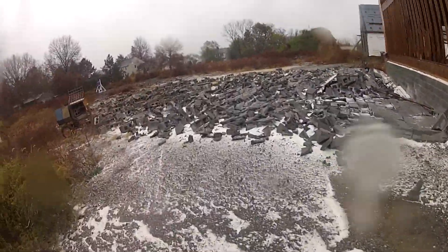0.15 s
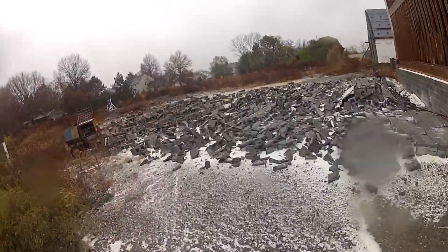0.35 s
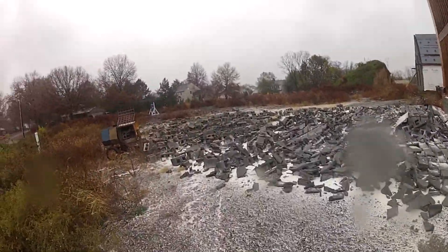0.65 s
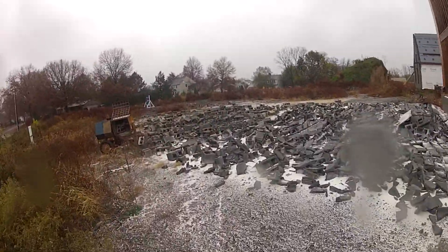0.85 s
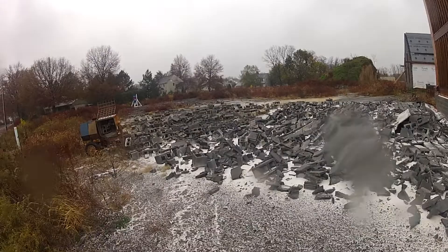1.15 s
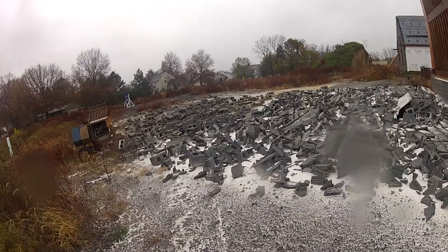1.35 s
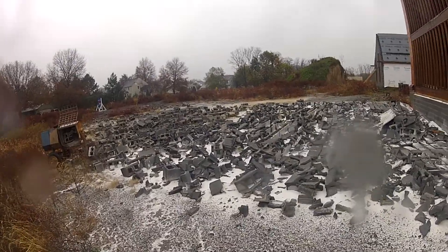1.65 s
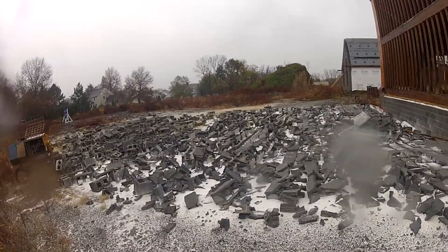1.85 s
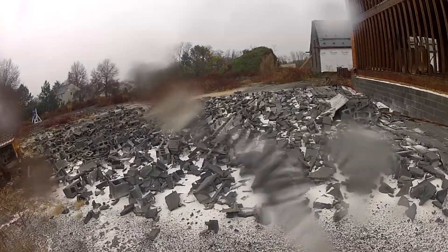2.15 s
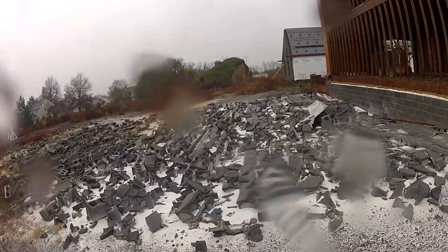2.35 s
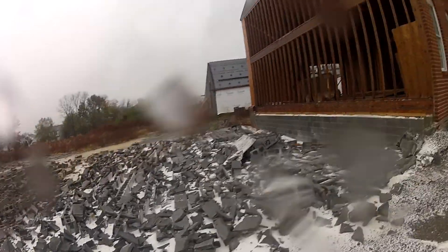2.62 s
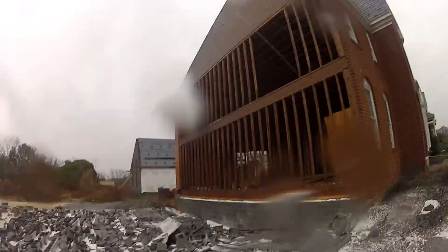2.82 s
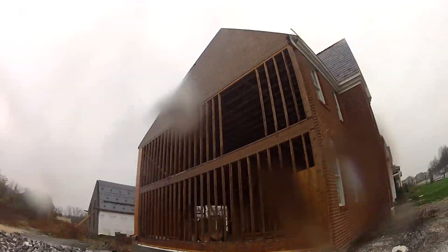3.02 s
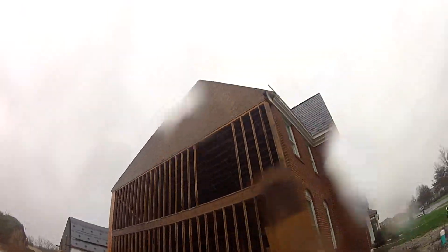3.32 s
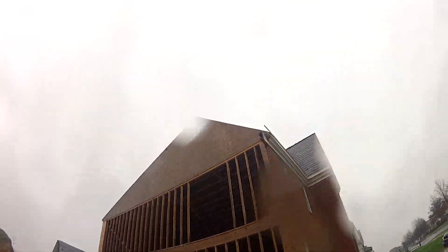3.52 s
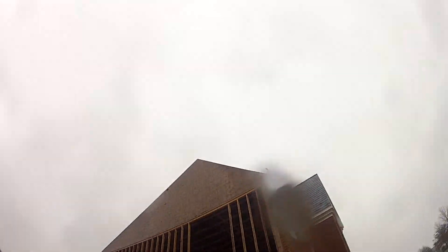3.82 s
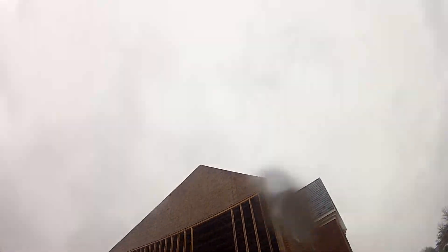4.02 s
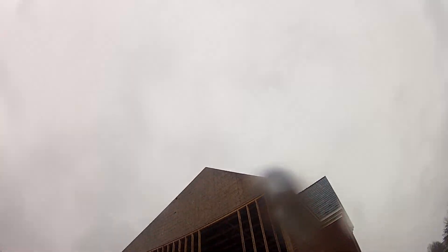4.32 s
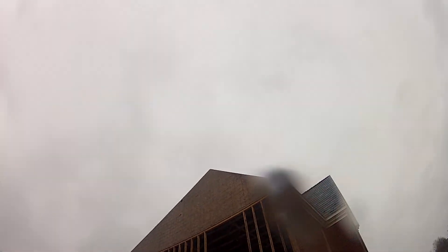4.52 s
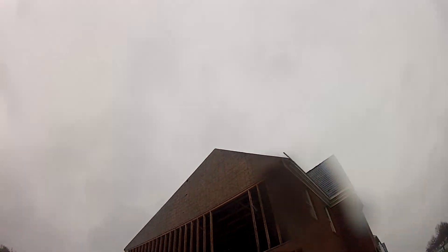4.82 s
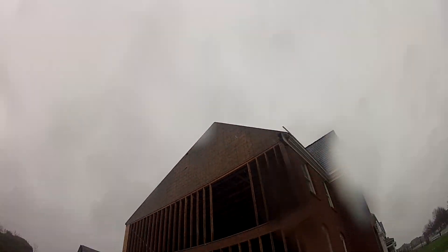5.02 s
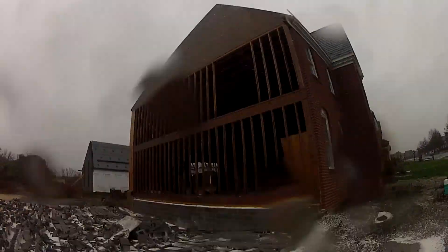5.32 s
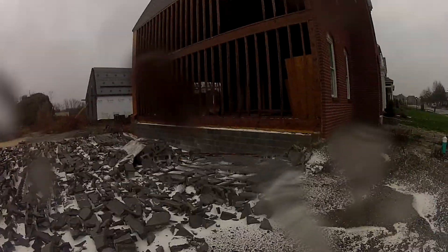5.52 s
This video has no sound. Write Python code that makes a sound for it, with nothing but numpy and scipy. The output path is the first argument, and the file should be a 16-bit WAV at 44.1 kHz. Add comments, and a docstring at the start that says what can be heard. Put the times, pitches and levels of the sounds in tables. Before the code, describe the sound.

Wind-driven rain and ice pellets strike a plastic camera housing outdoors, heard from inside the case, very close and dry. Over a faint muffled storm wash and low lumpy wind, light ticks begin around 0.3 s and cluster to 0.9 s; a bright hard crack comes at 1.13 s. From 1.6 s hits grow stronger, crowding between 1.85 and 2.3 s with tiny fizzes of droplets and a soft thump. At 2.96 s a sharp hit coincides with a drop popping on the left only. Around 3.5 s something wet slides over the shell with a very brief rising squeak and a short rasp, followed by hard knocks at 3.75 and 3.8 s, the latter with a deep thump. Ticks thin out after 4.1 s; from 4.55 to 5.4 s it is nearly calm. Then a gust swells, with a short rasp and a loud flurry of cracks at 5.45 to 5.52 s, ending in a fizz.

```python
"""Wind-driven rain and ice pellets tick against a camera's plastic housing outdoors.
Each hit cracks and rings the shell for a few milliseconds; faint drizzle ticks on between the hits.
Some tiny droplets fizz in short showers, soft blows thump the case, and one drop pops on the left only.
Twice something wet slides over the shell with a rasp, squeaking the first time.
Behind lie the muffled wash of the storm and a low rush of wind, noises that swell together in the gusts."""
import sys
import numpy as np
from scipy import signal
from scipy.io import wavfile
from scipy.ndimage import uniform_filter1d

SR = 44100
rng = np.random.default_rng(int(sys.argv[2]) if len(sys.argv) > 2 else 0)


def persist_wave(psi):
    """Save psi, clipped to +-1, as 16-bit WAV."""
    counts = np.round(np.clip(psi, -1, 1) * 32767).astype(np.int16)
    wavfile.write(sys.argv[1], SR, np.atleast_2d(counts).T)


N = 249606  # length of the scene in samples


def gain_of(db):
    """Turns decibels into a factor."""
    return 10 ** (np.asarray(db) / 20)


def evened(x):
    """Scales a signal to an average strength (rms) of 1."""
    return x / np.sqrt(np.mean(x ** 2) + 1e-20)


def read(points, hz):
    """Reads a spectrum between its points, along a log-frequency axis."""
    point_hz, value = np.transpose(points)
    return np.interp(np.log(hz + 1), np.log(point_hz + 1), value)


def add(mix, start_s, sound):
    """Mixes a sound in at a given time, cutting off what does not fit."""
    part = mix[max(round(start_s * SR), 0):][:len(sound)]
    part += sound[:len(part)]


def filtered(x, order, hz, kind):
    """Keeps only part of the pitch range, with a Butterworth filter."""
    return signal.lfilter(*signal.butter(order, hz, kind, fs=SR), x)


def noise(spectrum, patchy_db, flicker_db):
    """Coloured noise with small drifting patches and a quick flicker shared by all bands."""
    hz = np.fft.rfftfreq(2048, 1 / SR)
    real, imaginary, patches = rng.standard_normal((3, N // 512 + 5, len(hz)))
    patches = uniform_filter1d(patches, size=4, axis=0)  # smooth over time
    patches = evened(uniform_filter1d(patches, size=12, axis=1, mode="wrap"))  # and over pitch
    frames = (real + 1j * imaginary) * gain_of(read(spectrum, hz) + patchy_db * patches)
    coloured = signal.istft(frames.T, nperseg=2048, noverlap=1536)[1][:N]
    flicker = uniform_filter1d(rng.standard_normal(N), size=600)
    flicker = evened(uniform_filter1d(flicker, size=350))
    return evened(coloured * gain_of(flicker_db * flicker))


# strength of the wind over time: (time_s, level_db before the wind's boost)
GUSTS = [(0.0, -55), (1.02, -56), (2.61, -55.5), (3.18, -52.5), (3.39, -53), (3.77, -54), (3.94, -56.5),
         (4.52, -58), (4.78, -59), (5.42, -52.5), (5.55, -47.5), (5.66, -60.5)]


def gust_strength():
    """The wind's changing push, as a gain for every sample."""
    time_s, level_db = np.transpose(GUSTS)
    return gain_of(np.interp(np.arange(N) / SR, time_s, level_db))


# colour of the storm's wash heard through the case: (pitch_hz, relative level_db per Hz)
WASH_COLOUR = [(100, 2), (550, -8), (820, -1), (1100, -4), (1800, -2.5), (2230, 2.5), (2520, -12),
               (3000, -7), (4000, -14), (5000, -15.5), (6000, -27.5), (7000, -19), (9000, -18),
               (9450, -18.5), (9850, -12), (11000, -22), (12300, -32), (14200, -12.5), (14500, -19),
               (15150, -24), (15500, -39.5)]


def storm_wash(gust, level_db=-60, follow=0.49):
    """Distant rain blurs into noise; it gains `follow` dB for each dB of gust."""
    swell = evened(gust ** follow)
    return gain_of(level_db) * swell * noise(WASH_COLOUR, patchy_db=1, flicker_db=-0.8)


# colour of the wind on the case: (pitch_hz, relative level_db per Hz)
WIND_COLOUR = [(8.8, -30), (15, 3), (27, -3.5), (70, -3.5), (157, -11), (210, -14), (269, -15),
               (408, -22.5), (600, -31.5), (780, -46), (1320, -120)]


def wind_rush(gust, boost_db=2.5):
    """Wind on the case makes a low, lumpy rush that follows the gusts fully."""
    return gain_of(boost_db) * gust * noise(WIND_COLOUR, patchy_db=1.5, flicker_db=2.7)


# colour of the eddies that differ between the two microphone ports: (pitch_hz, relative level_db per Hz)
EDDY_COLOUR = [(12, -33.5), (20, 13), (377, -3), (1780, -24), (2100, -27), (2690, -16.5), (4950, -12),
               (6010, -26), (7300, -17.5), (15000, -55)]


def wind_eddies(level_db=-76):
    """Faint eddies push the two ports in opposite directions, so left and right differ."""
    eddies = gain_of(level_db) * noise(EDDY_COLOUR, patchy_db=2, flicker_db=2)
    return eddies * np.array([[1], [-1]])


# soft blows and buffets that push the whole case: (start_s, level_db before softening, swing_hz)
THUMPS = [(0.176, -35, 39.7), (0.738, -37.5, 107), (1.557, -36.5, 170), (2.061, -22.5, 390),
          (2.221, -33, 380), (2.452, -38, 100), (2.957, -24.5, 283), (3.627, -31.5, 35), (3.814, -17, 78.6),
          (3.9205, -24, 81), (4.925, -36, 178), (5.385, -34.5, 110)]


def thumps(damping=2, rise_s=0.00041, soft_hz=520):
    """A soft blow squeezes the air in the case: a quick push and one slow swing back."""
    out, t = np.zeros(N), np.arange(5000) / SR
    for start_s, level_db, swing_hz in THUMPS:
        swing = np.cos(2 * np.pi * swing_hz * t) * np.exp(-damping * swing_hz * t)
        onset = 1 - np.exp(-t / rise_s)
        add(out, start_s, -gain_of(level_db) * swing * onset)
    return filtered(out, 2, soft_hz, "lowpass")


# a drop that lands right on the left microphone port: (start_s, level_db before the leak)
PORT_DROP = (2.958, -16)


def port_drop(fall_s=0.0015, splash=0.2, splash_s=0.0023, leak_hz=110):
    """A sharp push and a tiny splash, heard on the left only; the slow part leaks away."""
    out, t = np.zeros((2, N)), np.arange(1500) / SR
    wet = filtered(rng.standard_normal(len(t)), 1, 3000, "lowpass") * np.exp(-t / splash_s)
    push = -np.exp(-t / fall_s)
    pop = filtered(splash * wet + push, 2, leak_hz, "highpass")
    start_s, level_db = PORT_DROP
    add(out[0], start_s, gain_of(level_db) * pop)
    return out


# ways the housing rings: (pitch_hz before detuning, level_db before colouring,
# t60_s = time to fall by 60 dB at sustain 1)
SHELL = [(654, -15.5, 0.003), (816, -10.5, 0.022), (1110, -13.5, 0.01), (1390, -3.5, 0.0088),
         (1662, -1, 0.01), (2120, 3, 0.013), (2313, -7.5, 0.024), (2920, -5.5, 0.015), (3464, -5.5, 0.0077),
         (4104, -16.5, .015), (4590, -11, 0.0096), (4910, -12, 0.011), (5290, -14, 0.0096),
         (6725, -11, 0.0063), (7110, -14.5, 0.0091), (7390, -15, 0.011), (7810, -20.5, 0.014),
         (8540, -11.5, 0.009), (9040, -15, 0.015), (9810, -11.5, 0.016), (10300, -14.5, 0.0081),
         (11500, -28.5, 0.02), (12800, -28.5, .02), (13130, -22, 0.0073), (14170, -11.5, 0.013),
         (14880, -17, .018)]


def ring(colour_db=0, spread_db=2, detune_hz=40, sustain=1):
    """The shell's answer to one blow; the spot that is struck sets each mode's sign and share."""
    pitch_hz, level_db, t60_s = np.transpose(SHELL)
    t = np.arange(1800)[:, None] / SR
    share, side, shift = rng.standard_normal((3, len(pitch_hz)))
    size = np.sign(side) * gain_of(level_db + colour_db + spread_db * share)
    decay = np.exp(-np.log(1000) * t / (t60_s * sustain))
    waves = np.cos(2 * np.pi * (pitch_hz + detune_hz * shift) * t)
    return (size * decay * waves).sum(1)


def patter(clicks, count=12, sustain=1):
    """Spreads a train of clicks over several spots of the shell, each with its own ring."""
    spot = rng.integers(0, count, N)
    out = np.zeros(N)
    for k in range(count):
        out += signal.oaconvolve(clicks * (spot == k), ring(sustain=sustain))[:N]
    return out


# click level before ringing and spread, and how much the lee shelters
DRIZZLE_DB, LEE_DB = -54, -20
# the spell in which the housing is turned out of the drizzle
LEE_START_S, LEE_END_S = 4.55, 5.38


def drizzle(per_s=22, spread_db=2.5, low_hz=1900):
    """Small drops tick faintly and thinly on the shell, much more faintly in the lee."""
    t = np.arange(N) / SR
    sheltered = (t > LEE_START_S) & (t < LEE_END_S)
    extra_db = spread_db * np.minimum(rng.exponential(1, N), 2.5)  # a few drops are larger
    size = gain_of(DRIZZLE_DB + LEE_DB * sheltered + extra_db)
    clicks = size * (rng.random(N) < per_s / SR)
    return filtered(patter(clicks), 1, low_hz, "highpass")


# showers of tiny droplets: (start_s, end_s, level_db)
SPRAYS = [(0.072, 0.092, -59.5), (1.905, 1.947, -53.5), (2.177, 2.208, -55.5), (5.517, 5.55, -55)]


def spray(per_s=420, low_hz=3300, high_hz=7800):
    """Tiny droplets land in quick showers and fizz as many short rings of the shell."""
    out = np.zeros(N)
    drops = patter(rng.random(N) < per_s / SR, sustain=0.32)
    fizz = filtered(drops, 3, [low_hz, high_hz], "bandpass")
    for start_s, end_s, level_db in SPRAYS:
        shower = evened(fizz[round(start_s * SR):round(end_s * SR)])
        add(out, start_s, gain_of(level_db) * shower)
    return out


# wet sliding over the shell, one row a stroke: (start_s, length_s, rasp level_db)
SLIDES = [(3.516, 0.135, -51.5), (5.4, 0.059, -52.5)]


def slide(scrapes_per_s=2500, sustain=0.97, fade_s=0.0073):
    """Random slips on the wet shell rasp for the length of each stroke."""
    out = np.zeros(N)
    slips = rng.standard_normal(N) * (rng.random(N) < scrapes_per_s / SR)
    rasp = evened(patter(slips, count=2, sustain=sustain))
    for start_s, length_s, level_db in SLIDES:
        t = np.arange(0, length_s, 1 / SR)
        envelope = np.minimum(np.minimum(t, length_s - t) / fade_s, 1)  # fades in and out
        add(out, start_s, gain_of(level_db) * envelope * rasp[round(start_s * SR):][:len(t)])
    return out


# the first stroke catches and squeaks: it swells, then lets go at once
SQUEAK_S, SQUEAK_SWELL_S, SQUEAK_RELEASE_S, SQUEAK_DB = 3.508, 0.04, 0.0053, -36
# its slips speed up from a slow start to a steady rate
SLIP_START_HZ, SLIP_TOP_HZ, SLIP_GLIDE_S = 880, 1008, 0.028


def squeak(jitter=0.006, rough=0.42, swell_power=2.0, pure_db=-47.5, pure_s=0.013, sustain=0.89):
    """Regular stick and slip: a nearly pure note at first, then sharper, uneven slips that ring the shell."""
    out, t = np.zeros(N), np.arange(6000) / SR
    drift = evened(uniform_filter1d(rng.standard_normal(len(t)), size=80))
    grip = evened(uniform_filter1d(rng.standard_normal(len(t)), size=80))
    glide = np.minimum(t / SLIP_GLIDE_S, 1) ** 2
    slip_hz = SLIP_START_HZ + (SLIP_TOP_HZ - SLIP_START_HZ) * glide
    turns = np.cumsum(slip_hz * (1 + jitter * drift)) / SR
    unevenness = 1 + rough * grip
    # the overtones make the sharp slips, the lowest tone the pure note
    slips = unevenness * sum(np.cos(2 * np.pi * k * turns) for k in range(2, 16))
    note = unevenness * np.sin(2 * np.pi * turns)
    swell = (t / SQUEAK_SWELL_S) ** swell_power
    release = np.exp((SQUEAK_SWELL_S - t) / SQUEAK_RELEASE_S)
    rung = evened(signal.oaconvolve(slips, ring(sustain=sustain))[:len(t)])
    add(out, SQUEAK_S, gain_of(SQUEAK_DB) * np.minimum(swell, release) * rung)
    note_envelope = t / pure_s * np.exp(1 - t / pure_s)  # peaks at pure_s
    add(out, SQUEAK_S, gain_of(pure_db) * note_envelope * evened(note))
    return out


# the sheen above 9.4 kHz: its dB for a pellet of the given strength, and the dB it gains per dB of strength
SHEEN_DB, SHEEN_AT_DB, SHEEN_FOLLOW = 2, -28.5, 0.12
# the impacts that stand out; where and how hard a pellet lands sets its colour:
# (start_s, strength_db before the small strike trim, boom_db of the wall near 800 Hz,
# middle_db of the ring near 3 kHz, hard_db of the crack at 4-9 kHz)
PELLETS = [(0.3234, -32, 7, -3.5, 8.5), (0.4058, -32, 5, 7, 5.5), (0.4196, -41, 5, -1, 0),
           (0.514, -46, -19, 0, 5), (0.547, -42.5, -5, -2, -5), (0.5672, -41, -3, 4, 4),
           (0.617, -42, -6, 11.5, 3), (0.6222, -46.5, 6, 3, 9.5), (0.7848, -39.5, -14, 0, -4),
           (0.801, -28, 1, 3.5, 2.5), (0.8131, -36, 4, 4, 5.5), (0.8596, -40.5, 3, 8, 7),
           (0.877, -38.5, -10, 2, -1), (0.8843, -33.5, 8, 1, -4), (1.133, -19.5, -2.5, 14.5, 14),
           (1.2605, -47.5, 2, 8, 12), (1.3194, -44, 11, 10, 9), (1.383, -31.5, 4, 5.5, 3.5),
           (1.4242, -38, -2, 7.5, 7), (1.4677, -45, 6, 6, 11.5), (1.497, -42.5, 1, 10, 7),
           (1.6017, -25, -2, 6, 3), (1.607, -26.5, 5, 8, 5), (1.645, -27, -1, -1.5, 1),
           (1.6663, -44, -3, 5, 9), (1.7312, -43, 0, 3.5, -3), (1.803, -37, -16, 0, -8),
           (1.8478, -26.5, 8.5, 4.5, 2), (1.895, -19, 6, -6, 0), (1.8978, -21.5, 7, 10, 4),
           (2.0345, -17, -23, -4, 3), (2.0445, -23.5, 9, 10, 3), (2.0611, -18.5, 14.5, -16, -16),
           (2.097, -40, -4, 0, -6), (2.112, -19.5, -12, -3, -9.5), (2.253, -41.5, -20, -8, 4.5),
           (2.2782, -14.5, 0, -4, -8), (2.3019, -38.5, 16, 5, 13), (2.307, -22, -9, -15, -0.5),
           (2.493, -34.5, -13.5, -1.5, -9), (2.6086, -50, 17, 5.5, 5), (2.6738, -37, -2, 1, 1),
           (2.7992, -22, 5, -28, -14), (2.958, -14.5, 6.5, 9, 6), (2.9923, -41, 4, 7, -11),
           (3.035, -35.5, -7, -18, 0), (3.1111, -45.5, 7, 5, 7), (3.133, -46, -3, 4, 12),
           (3.1492, -43.5, 0, 14, 15), (3.3264, -43.5, 8.5, -4, -5), (3.3978, -28, 0.5, 11.5, 14.5),
           (3.5955, -38, 9, 6, 8), (3.6238, -38, 4, -11, -12), (3.6434, -24, 11.5, -2, 2),
           (3.7477, -16.5, 3.5, 2.5, 3.5), (3.815, -16.5, 10.5, -2.5, -5.5), (3.9213, -38.5, 15, -7, -10),
           (3.9347, -33.5, 1, -10, -6.5), (4.0805, -30, 2, 6, 8.5), (4.1794, -31, 5, 3.5, 2.5),
           (4.2163, -38, 0, -11, 5.5), (4.3708, -28.5, 8.5, 5, -14), (4.4577, -31.5, -8, 1.5, 6),
           (5.1305, -36, 11.5, -3, 7.5), (5.432, -39.5, 21.5, -11, -13), (5.4508, -13, 4.5, 3.5, -2.5),
           (5.477, -17, 0, -3, -8), (5.5069, -23.5, 7, 7.5, -1), (5.5177, -24, 5, 6, 2.5)]


def pellets(strike_db=-0.11, crack_db=-10, crack_s=0.00048, rebound=0.4, rebound_s=0.0008):
    """Each pellet cracks on contact and rings the shell; hard ones ring bright, soft ones boom."""
    out, t = np.zeros(N), np.arange(400) / SR
    # sorts the shell's modes into boom, neutral, middle, hard and sheen
    zone = np.digitize(np.transpose(SHELL)[0], [1150, 2500, 3800, 9400])
    for start_s, strength_db, boom_db, middle_db, hard_db in PELLETS:
        sheen_db = SHEEN_DB + SHEEN_FOLLOW * (strength_db - SHEEN_AT_DB)
        colour_db = np.array([boom_db, 0, middle_db, hard_db, sheen_db])[zone]
        tick = ring(colour_db, spread_db=1, detune_hz=35)
        burst = rng.standard_normal(len(t)) * np.exp(-t / crack_s)
        crack = filtered(burst, 2, [2800, 10000], "bandpass")
        add(tick, 0, gain_of(hard_db + crack_db) * crack)
        hit = gain_of(strength_db + strike_db) * tick
        add(out, start_s, hit)
        # the pellet breaks up and touches again within a millisecond or so:
        # each tick gets its own ripple of resonances
        add(out, start_s + rebound_s * rng.uniform(0.5, 2), rebound * hit)
    return out


# bands that the housing hardly passes: (pitch_hz, width_hz)
NULLS = [(6020, 920), (11750, 1200), (12300, 1600)]


def through_case(x, low_hz, high_hz=15300):
    """The way from shell to microphone cancels a few bands and loses both ends."""
    for pitch_hz, width_hz in NULLS:
        x = signal.lfilter(*signal.iirnotch(pitch_hz, pitch_hz / width_hz, SR), x)
    x = signal.sosfilt(signal.butter(2, low_hz, "highpass", fs=SR, output="sos"), x)
    return signal.sosfilt(signal.butter(6, high_hz, fs=SR, output="sos"), x)


def scene():
    """Everything that strikes the housing, over the storm."""
    shell = pellets() + drizzle() + spray() + slide() + squeak()
    blows = through_case(shell, low_hz=470) + thumps() + port_drop()
    gust = gust_strength()
    storm = storm_wash(gust) + wind_rush(gust) + wind_eddies()
    return blows + storm


def record(dry, ceiling=0.96, edge_hz=16300):
    """The microphone rounds off the very sharpest peaks; then the highest treble is cut."""
    rounded = ceiling * np.tanh(dry / ceiling)
    treble_cut = signal.firwin(127, edge_hz, window=("kaiser", 9), fs=SR)
    return signal.oaconvolve(rounded, treble_cut[None], "same")


dry = scene()
out = record(dry)
persist_wave(out)
```